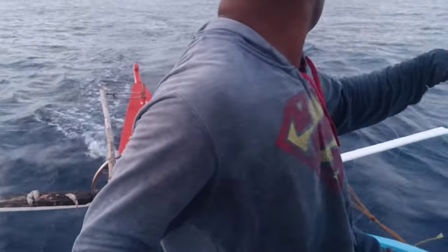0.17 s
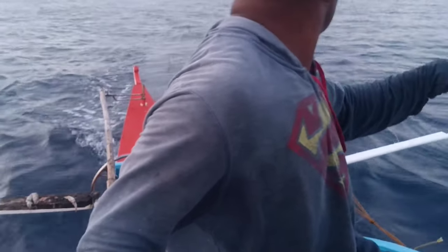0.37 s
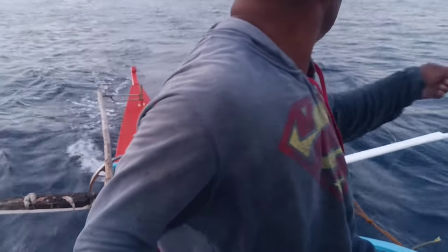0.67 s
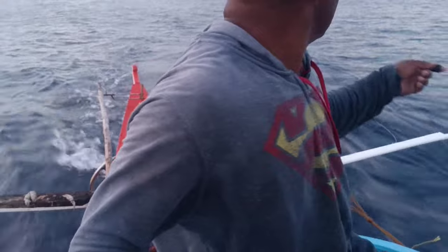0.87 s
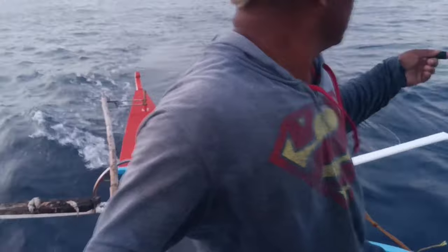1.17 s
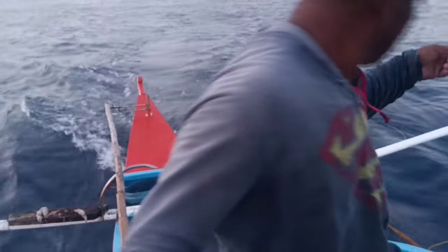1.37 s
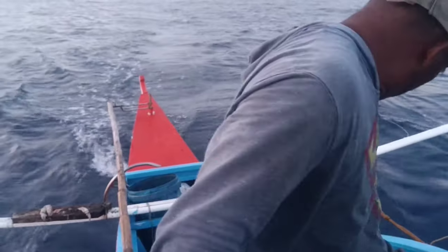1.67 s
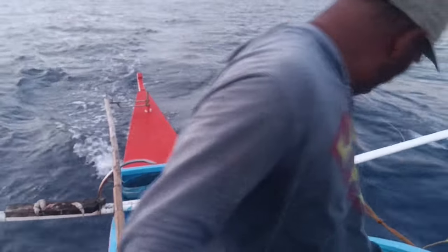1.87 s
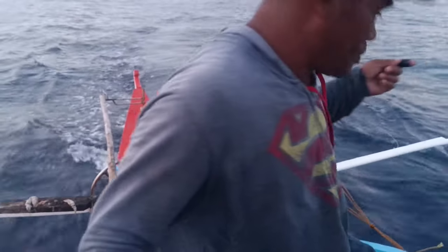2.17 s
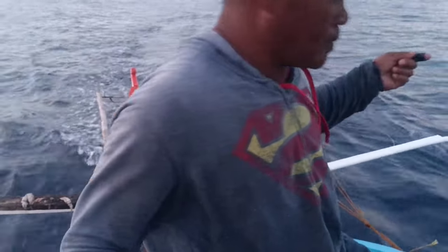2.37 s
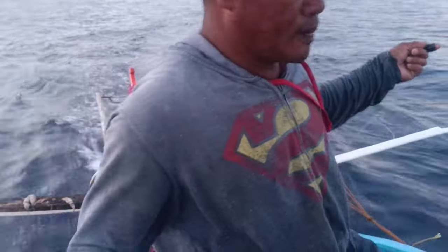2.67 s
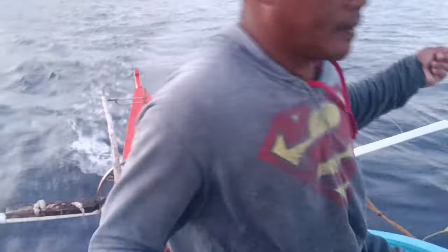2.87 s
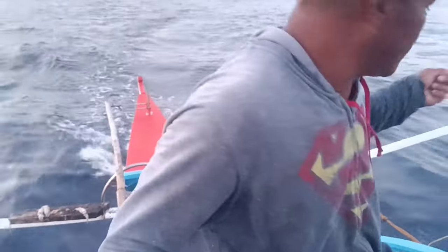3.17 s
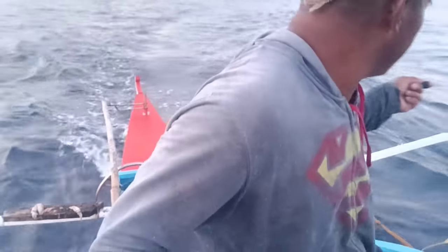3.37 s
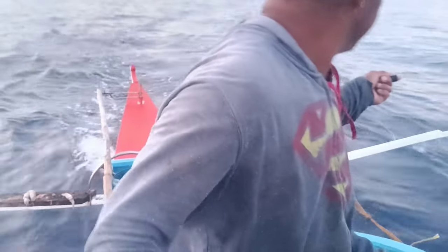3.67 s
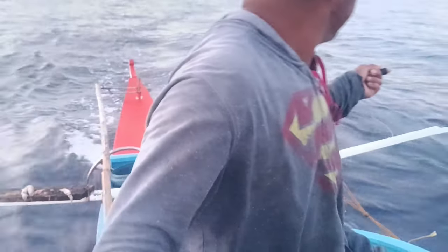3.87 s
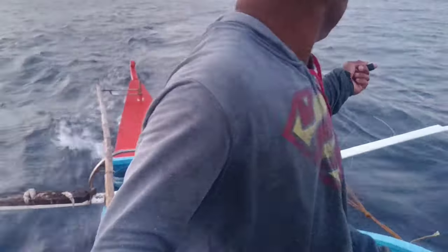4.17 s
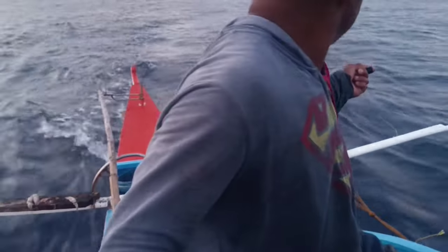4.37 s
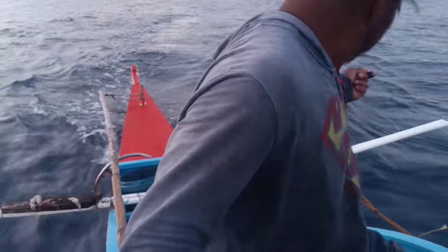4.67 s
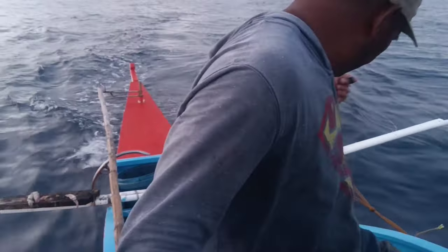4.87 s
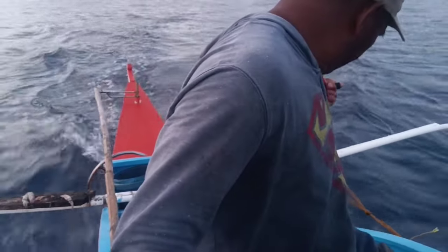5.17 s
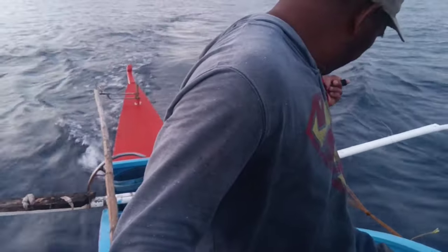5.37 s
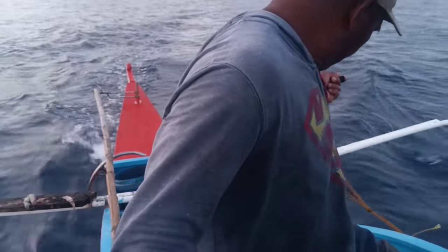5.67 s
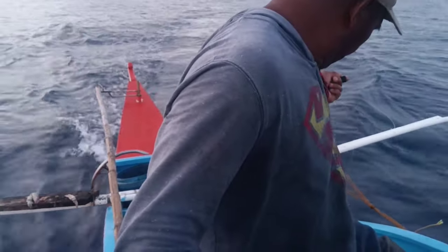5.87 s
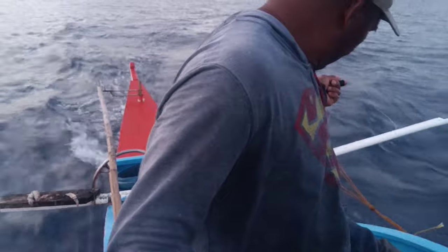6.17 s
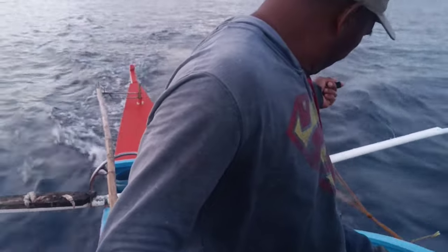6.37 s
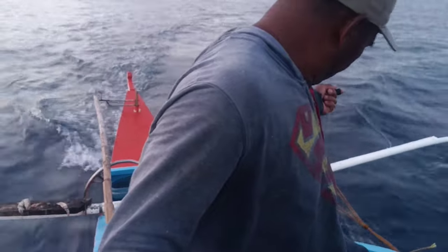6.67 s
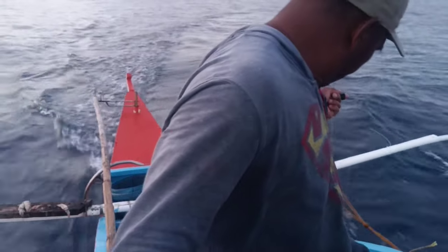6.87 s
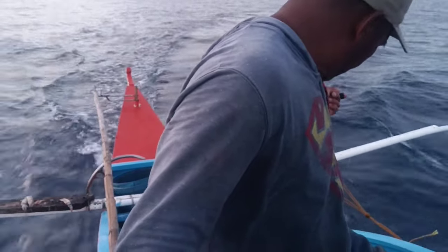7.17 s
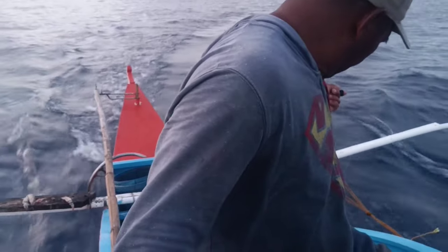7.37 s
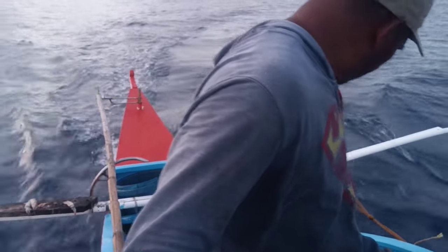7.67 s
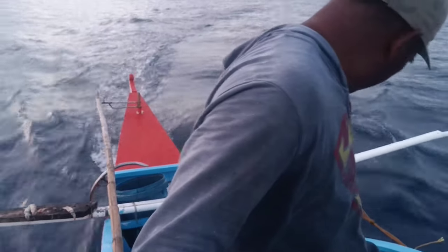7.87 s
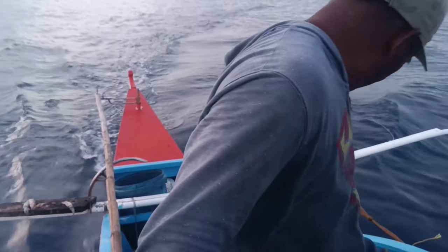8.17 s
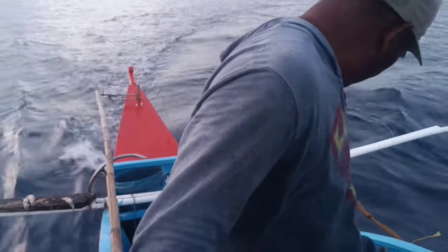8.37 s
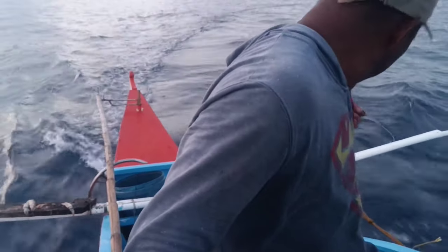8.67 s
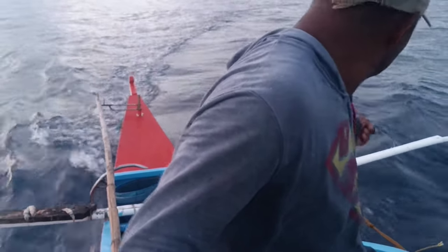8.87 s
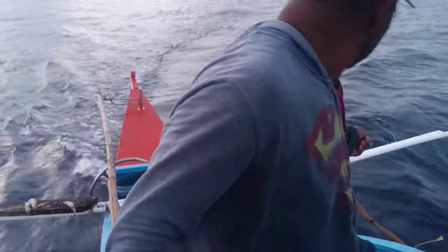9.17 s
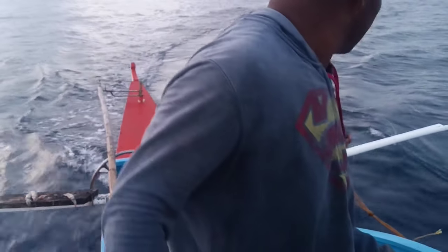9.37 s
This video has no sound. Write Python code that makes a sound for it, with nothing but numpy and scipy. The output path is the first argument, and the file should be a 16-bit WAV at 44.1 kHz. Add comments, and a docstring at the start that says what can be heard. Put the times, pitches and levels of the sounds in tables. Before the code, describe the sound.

A single-cylinder engine runs at cruising speed, heard close on board a small boat. About fourteen firings a second boom through the muffler, knock the hull and set loose steel rattling, while the wake hisses behind. Loose metal clacks several times in the first four seconds, loudest at 1.5 seconds, along with a low rush of water. From about 4.4 to 5.1 seconds the engine slows, settling into an uneven, shuddering idle of ten or eleven firings a second with gentler rattling. Water surges against the hull near 4.7 and 5.9 seconds, and the wake's hiss gradually fades. A panel rings faintly around 5 and 9 seconds, and a brief low wavering hum swells near 8 seconds. Tiny scratchy rubs brush the microphone's left side, mostly between 4.6 and 8.3 seconds. The idle continues to the end, around 9.5 seconds.

```python
"""Outrigger boat, throttling back

On board, close to a single-cylinder engine that runs at cruising speed, then drops to an idle.
Each firing booms through the muffler, knocks the hull and sets the metalwork clattering; loose steel
rattles, hardest under load. Astern the wake hisses, fading as the boat loses way.
Now and then something brushes the left microphone port."""
import sys
import numpy as np
from scipy import signal
from scipy.fft import rfft, irfft, next_fast_len
from scipy.io import wavfile
from scipy.ndimage import uniform_filter1d, minimum_filter1d, map_coordinates

SR = 44100
rng = np.random.default_rng(int(sys.argv[2]) if len(sys.argv) > 2 else 0)


def pcm_store(signal):
    """Save signal as 16-bit PCM."""
    levels = np.round(np.clip(np.atleast_2d(signal), -1, 1) * 32767)
    wavfile.write(sys.argv[1], SR, levels.astype(np.int16).T)


N = 419832

# Engine speed. Each row: time in seconds, firings a second.
ENGINE_SPEED = [(0.0, 14.047), (1.58, 14.312), (1.88, 14.058), (3.23, 14.171), (3.44, 14.078),
                (4.4, 14.145), (4.67, 12.601), (5.1, 11.301), (5.6, 11.031), (6.62, 10.685), (7.18, 10.88),
                (7.4, 10.649), (8.56, 10.565), (8.75, 10.73), (9.52, 10.481)]
# Piston and valve blows. Each row: position as a share of the cycle, relative level in dB.
CYCLE_BLOWS = [(.02, 4.5), (.17, -1), (.38, 2.5), (.62, -6), (.86, 0)]
# Hard landings of loose metal. Each row: start in seconds, gain in dB.
CLACK_HITS = [(1.251, -36), (1.466, -19.5), (2.029, -34), (2.949, -31), (4.010, -29), (8.488, -40)]
# Rubs on the left port. Each row: start in seconds, level in dB, length in seconds.
PORT_BRUSHES = [(1.464, -24.5, 0.027), (2.905, -27.5, 0.023), (4.615, -33.5, 0.031), (4.691, -30, 0.025),
                (5.707, -32, .016), (5.868, -32, .044), (6.02, -31, 0.023), (6.591, -31, 0.024),
                (6.952, -33, 0.04), (7.559, -31.5, .011), (8.017, -30.5, .013), (8.268, -34, 0.029)]

# Swells. Each row: time of the crest in seconds, half length in seconds, level in dB.
WATER_SURGES = [(1.55, 0.39, -23), (4.7, 0.24, -27), (5.866, 0.11, -24.5)]
SINGING_SWELLS = [(5.153, 0.45, -36.5), (9.098, 0.74, -39.5)]

# Resonances. Each row: frequency in Hz, width in Hz, relative level in dB.
HULL_MODES = [(57.2, 5.9, -2.5), (110.94, 2.36, 13.5), (188.5, 6.8, 5), (257.9, 18, 5.5), (309.4, 24, 3.5),
              (369.3, 5.1, 0.5), (398, 10, -17.5), (439, 5.3, -24)]
PANEL_MODES = [(601, 32, 7.5), (847, 49, -6)]
LOADED_PART_MODES = [(872, 50, -8), (1121, 30, -6.5), (1563, 32, -5.5), (1711, 64, -2), (1869, 33, 1.5),
                     (2280, 110, -12), (4535, 31, -18)]  # engine parts under load
IDLE_PART_MODES = [(846, 39, -5.5), (1010, 100, -7.5), (1696, 27, -1), (1797, 60, 3), (1913, 33, -7),
                   (2243, 19, 0.5)]  # engine parts at idle

# Noise spectra. Each row: frequency in Hz, relative spectral density in dB.
WAKE_SPECTRUM = [(300, 6), (1000, 14.5), (2500, 10), (3900, -0.5), (5200, -1), (7500, -5.5), (10200, -9),
                 (12300, -0.5), (16000, -10)]
SURGE_SPECTRUM = [(100, -25), (200, 1), (340, 0.5), (450, -9), (900, -40.5)]
BRUSH_SPECTRUM = [(1500, 0), (4000, 4.5), (7000, -1), (10000, -2.5), (13000, 2.5), (16000, -3)]
CLACK_SPECTRUM = [(300, -25), (900, -32), (2000, 14.5), (3200, 12), (4500, -11), (9000, -33), (16000, -30)]
RATTLE_SPECTRUM = [(700, -28), (1600, 10.5), (3000, 6.5), (3800, 0.5), (4600, 3), (7500, 1), (10200, -4.5),
                   (12500, 1), (15500, -6)]
CASING_SPECTRUM = [(250, -30), (520, -2.5), (800, 1.5), (1100, -1.5), (1400, -1.5), (1900, -7), (2700, -10),
                   (3300, -9.5), (3900, -29), (6000, -40), (10000, -59)]
SHUDDER_SPECTRUM = [(20, -16), (36, -15), (55, -9.5), (95, -0.5), (180, 0), (300, -2), (420, -6.5),
                    (550, -21), (1200, -49)]

# How alike the two microphone ports hear the boat. Each row: frequency in Hz, correlation from 0 to 1.
PORT_LIKENESS = [(60, 1), (160, 0.6), (350, 0.72), (700, 0.56), (1400, 0.31), (2800, 0.1), (6000, 0)]
# The right port's dull treble. Each row: frequency in Hz, gain in dB.
RIGHT_PORT = [(8500, 0), (10500, -2.0), (12500, -16.0), (16000, -1)]

IDLE_HZ, CRUISE_HZ = 10.5, 14.1  # firing rates at propeller load 0 and 1
# Gains in dB. Each pair: idling, under load.
EXHAUST_DB, HULL_DB, PANEL_DB = (-14.5, -14.5), (-25, -23.5), (-39, -42)
CLATTER_DB, RATTLE_DB = (-33, -31), (-39.5, -37.5)
THUD_DB, SHUDDER_DB = (-15, -16.5), (1, -4.5)  # against the muffler's boom; against the hull's knocks


def amp(db):
    """Decibels to gain."""
    return 10 ** (np.asarray(db) / 20)


def unit(x):
    """x at rms 1."""
    return x / np.sqrt(np.mean(x ** 2) + 1e-20)


def along(points, hz):
    """(Hz, value) points read on a log axis."""
    f, v = np.transpose(points)
    return np.interp(np.log(hz + 1), np.log(f + 1), v)


def by_load(levels_db, load):
    """Gain between a part's idling level and its level under load."""
    idle_db, loaded_db = levels_db
    return amp(idle_db + (loaded_db - idle_db) * load)


def swell(s, half_s):
    """A smooth rise to 1 at time s and the fall after it."""
    return np.exp(-((np.arange(N) / SR - s) / half_s) ** 2)


def wobble(rate):
    """A smooth random curve, rate knots a second."""
    knots = rng.standard_normal(int(N * rate / SR) + 4)
    return map_coordinates(knots, [np.arange(N) * rate / SR])


def filtered(x, response):
    """x times a complex response of frequency."""
    n = x.shape[-1]
    padded = next_fast_len(n + SR // 2)
    return irfft(rfft(x, padded) * response(np.fft.rfftfreq(padded, 1 / SR)), padded)[..., :n]


def resonance(f, hz, width_hz):
    """Causal response of one damped resonance."""
    return 1j * f * width_hz / (hz * hz - f * f + 1j * f * width_hz)


def rung(x, modes):
    """x rung through a set of resonances."""
    return filtered(x, lambda f: sum(amp(db) * resonance(f, hz, width) for hz, width, db in modes))


def spread(pair):
    """Two unrelated signals as left and right: shared in the bass, apart in the treble."""
    turn = lambda f: np.arccos(np.clip(along(PORT_LIKENESS, f), -1, 1)) / 2
    mid, side = filtered(pair, lambda f: np.array([np.cos(turn(f)), np.sin(turn(f))]))
    return np.array([mid + side, mid - side])


def coloured(x, spectrum):
    """x shaped by a spectrum, at rms 1."""
    return unit(filtered(x, lambda f: amp(along(spectrum, f))))


def pulses(times, sizes):
    """Impulses of the given sizes at the given times."""
    at = np.round(times * SR).astype(int)
    inside = (at >= 0) & (at < N)
    return np.bincount(at[inside], sizes[inside], N)


def strokes(crank, share, scatter_db, jitter_s):
    """One impulse a cycle, when the crank passes the given share of it."""
    cycles = np.arange(int(crank[-1]) + 1) + share
    late, size = rng.standard_normal((len(cycles), 2)).T
    times = np.interp(cycles, crank, np.arange(N) / SR, left=-1, right=-1)
    return pulses(times + jitter_s * late, amp(scatter_db * size))


def bursts(hits, rise_s, t60):
    """The envelope that follows each hit: a quick swell, then a decay of 60 dB in t60 seconds."""
    t = np.arange(SR // 3) / SR
    envelope = (1 - np.exp(-t / rise_s)) * amp(-60 * t / t60)
    return signal.fftconvolve(hits, envelope)[:N]


def grit(spiky_db):
    """Two channels of dense tiny contacts of very uneven size."""
    return unit(rng.standard_normal((2, N)) * amp(spiky_db * rng.standard_normal((2, N))))


def metal(x, t60):
    """x rung through the crowded, evenly strong modes of casing and boards, as each port hears them."""
    t = np.arange(SR // 8) / SR
    modes = rfft(rng.standard_normal((2, len(t))) * amp(-60 * t / t60))
    even = modes / np.sqrt(uniform_filter1d(np.abs(modes) ** 2, size=40, axis=1))
    return signal.fftconvolve(x, irfft(even), axes=1)[:, :N]


def patchy(x, depth_db):
    """Each contact rings a little differently: random patches of gain in time and frequency."""
    spectra = signal.stft(x, nperseg=512)[2]
    patches = uniform_filter1d(rng.standard_normal(spectra.shape), size=5, axis=1)
    patches = uniform_filter1d(patches, size=7, axis=2)
    return signal.istft(spectra * amp(depth_db * unit(patches)), nperseg=512)[1][:, :N]


def wake(load, coast_s=2.1):
    """Water fizzes astern, more prominent once the engine eases, then fading as the boat loses way."""
    inertia = np.exp(-1 / (coast_s * SR))
    way = 1 + signal.lfilter([1 - inertia], [1, -inertia], load - 1)  # lags the load, from full way
    fizz = coloured(patchy(grit(spiky_db=3), depth_db=1), WAKE_SPECTRUM)
    lapping = amp(1.1 * wobble(13))
    return spread(fizz) * lapping * amp(-34.5 + 3 * way - 4.5 * load)


def surges():
    """Low rushes of water against the hull."""
    rush = spread(coloured(rng.standard_normal((2, N)), SURGE_SPECTRUM))
    return rush * sum(amp(db) * swell(s, half_s) for s, half_s, db in WATER_SURGES)


def hum(base_hz=220, rise_hz=29.6):
    """One low wavering hum rises in pitch as it swells, and sinks away."""
    strength = swell(s=8.15, half_s=0.17)
    hz = base_hz + rise_hz * strength + 5 * wobble(44)
    tone = np.sqrt(2) * np.sin(2 * np.pi * np.cumsum(hz) / SR)
    return tone * strength * amp(-26 + 1.5 * wobble(25))


def panel(load):
    """A panel on board sings in two narrow modes, mostly at low revs, and swells now and then."""
    ring = spread(unit(rung(rng.standard_normal((2, N)), PANEL_MODES)))
    swells = sum(amp(db) * swell(s, half_s) for s, half_s, db in SINGING_SWELLS)
    return ring * (by_load(PANEL_DB, load) + swells)


def brushes():
    """Short scratchy rubs catch and slip right at the left port, faint on the right."""
    t = np.arange(N) / SR
    touch = np.zeros(N)
    for start, db, length in PORT_BRUSHES:
        corners_s = [start - .003, start + 0.00082, start + length, start + 1.57 * length]
        touch += amp(db) * np.interp(t, corners_s, [0.0037, 1.0, 0.93, 0.0014])
    catches = amp(3 * wobble(300))
    scratch = coloured(grit(spiky_db=6), BRUSH_SPECTRUM)
    return unit(scratch * catches) * touch * amp([[0], [-13]])


def clacks():
    """Now and then a loose piece of metal lands hard."""
    starts, db = np.transpose(CLACK_HITS)
    contacts = spread(coloured(grit(spiky_db=11), CLACK_SPECTRUM))
    return contacts * bursts(pulses(starts, amp(db)), rise_s=0.00049, t60=0.14)


def rattle(crank, load):
    """Loose steel is thrown at every firing, hard under load and more gently at idle."""
    throws = strokes(crank, -0.011, scatter_db=1, jitter_s=0.00086) * (0.41 + 0.45 * load)
    shaking = bursts(throws, rise_s=0.005, t60=0.083) + 0.13 * bursts(throws, rise_s=0.0048, t60=0.13)
    contacts = grit(spiky_db=7.2) * shaking
    return coloured(patchy(metal(contacts, t60=.016), depth_db=5), RATTLE_SPECTRUM)


def clatter(crank, load):
    """Piston and valves strike at set crank angles; each blow chatters, ringing casing and parts."""
    blows = sum(amp(db) * strokes(crank, share, scatter_db=3, jitter_s=.0005)
                for share, db in CYCLE_BLOWS)
    force = bursts(blows, rise_s=0.002, t60=0.069) + 0.31 * (1 - load)  # unbroken chatter at idle
    chatter = unit(grit(spiky_db=4) * force)
    drive = unit(grit(spiky_db=2.5) * force) + 0.55 * unit(blows) * load
    casing = coloured(patchy(metal(chatter, t60=.025), depth_db=1), CASING_SPECTRUM)
    loaded_ring = load * unit(rung(drive, LOADED_PART_MODES))
    idle_ring = (1 - load) * amp(1) * unit(rung(drive, IDLE_PART_MODES))
    parts = patchy(loaded_ring + idle_ring, depth_db=1.85)
    return spread(amp(-1.5) * casing + amp(-2) * parts)


def hull(crank, load):
    """The power stroke knocks the hull and rebounds; at idle it is uneven and the boat shudders more."""
    steady = strokes(crank, .161, scatter_db=.7, jitter_s=.00008)
    loose = strokes(crank, .187, scatter_db=1.2, jitter_s=.0008)
    knocks = steady * load + 0.79 * loose * (1 - load)
    rebound = lambda f: 1 + .65 * np.exp(-2j * np.pi * f * .0161)  # a weaker knock 16.1 ms later
    soft_mounts = lambda f: 1 / (1 + (f / 560) ** 10)  # they pass no click
    thumps = filtered(knocks, lambda f: rebound(f) * soft_mounts(f))
    wood = unit(rung(thumps, HULL_MODES))
    shaking = 0.53 + bursts(knocks, rise_s=0.01, t60=0.16)
    shudder = coloured(rng.standard_normal((2, N)) * shaking, SHUDDER_SPECTRUM)
    return wood + by_load(SHUDDER_DB, load) * spread(shudder)


def exhaust(crank, load):
    """Each puff rings two like muffler chambers in turn, so the boom swells and dies; the pipe thuds."""
    puffs = strokes(crank, 0, scatter_db=.4, jitter_s=.0001)
    muffler = lambda f, hz, width_hz: 1j * hz / (f + 1) * resonance(f, hz, width_hz) ** 2
    loaded_boom = filtered(puffs * load, lambda f: muffler(f, hz=153.5, width_hz=33))
    idle_boom = filtered(puffs * (1 - load), lambda f: muffler(f, hz=151.5, width_hz=31))
    pipe = lambda f: resonance(f, hz=86, width_hz=24) / (1 + (f / 250) ** 4)
    thud = filtered(puffs, pipe)
    return unit(loaded_boom + idle_boom) + by_load(THUD_DB, load) * unit(thud)


def scene():
    """The boat from on board: the crank times the engine's strokes, the load sets their balance."""
    firing_hz = np.interp(np.arange(N) / SR, *np.transpose(ENGINE_SPEED))
    crank = .29 + np.cumsum(firing_hz) / SR  # in cycles, starting partway through one
    revs = np.clip((firing_hz - IDLE_HZ) / (CRUISE_HZ - IDLE_HZ), 0, 1)
    load = revs ** 3  # the propeller's load climbs steeply with speed
    low = by_load(EXHAUST_DB, load) * exhaust(crank, load)
    low = low + by_load(HULL_DB, load) * hull(crank, load) + surges() + hum()
    middle = by_load(CLATTER_DB, load) * clatter(crank, load) + panel(load) + clacks()
    high = by_load(RATTLE_DB, load) * rattle(crank, load) + wake(load)
    # Lows and highs sit a little right of centre.
    return low * amp([[-.4], [.4]]) + middle + high * amp([[-1.1], [1.1]]) + brushes()


def limiter(x, ceiling_db=-1.13, hold_s=0.0034):
    """Looks ahead and holds the tops of the strongest firings under the ceiling."""
    needed = np.minimum(1, amp(ceiling_db) / (np.abs(x).max(axis=0) + 1e-9))
    size = int(hold_s * SR) + 1
    return x * uniform_filter1d(minimum_filter1d(needed, 2 * size), size)


def record(dry, top_hz=15750):
    """A stereo microphone with a limiter: the right port is dull up high, and nothing passes top_hz."""
    ports = lambda f: np.array([np.ones_like(f), amp(along(RIGHT_PORT, f))])
    return filtered(limiter(dry), lambda f: ports(f) * (f < top_hz))


dry = scene()
out = record(dry)
pcm_store(out)
```